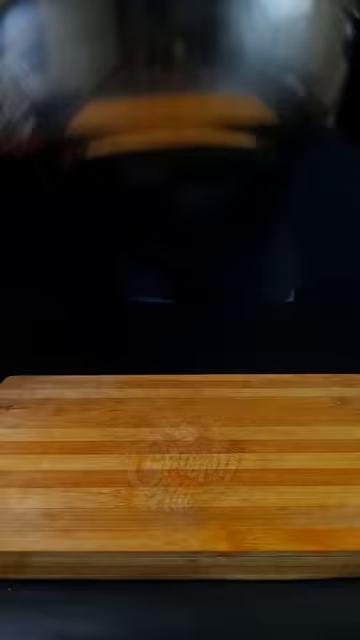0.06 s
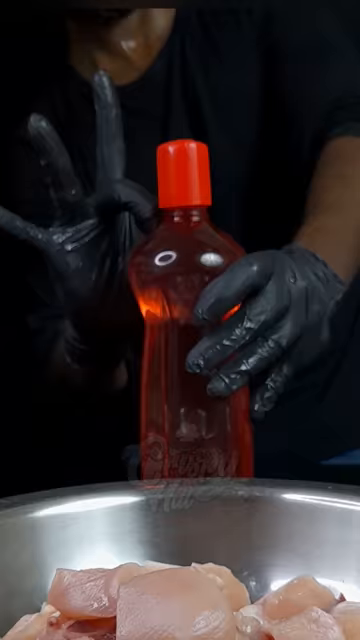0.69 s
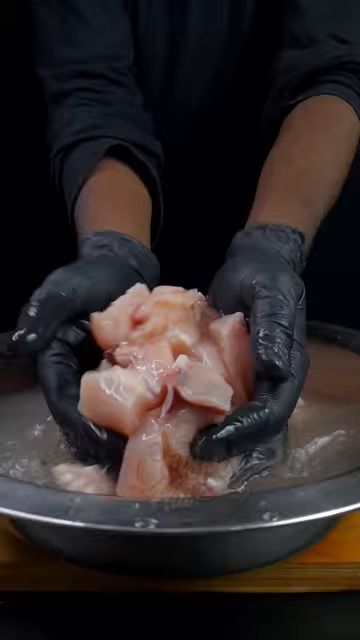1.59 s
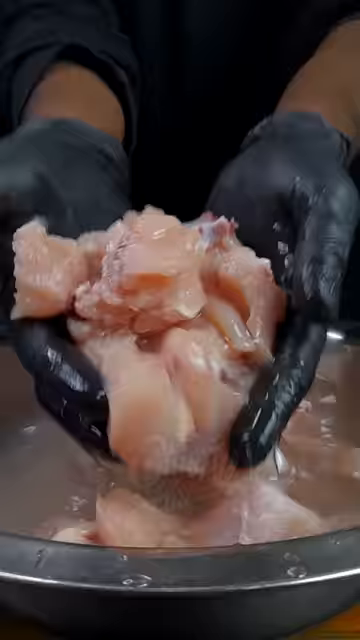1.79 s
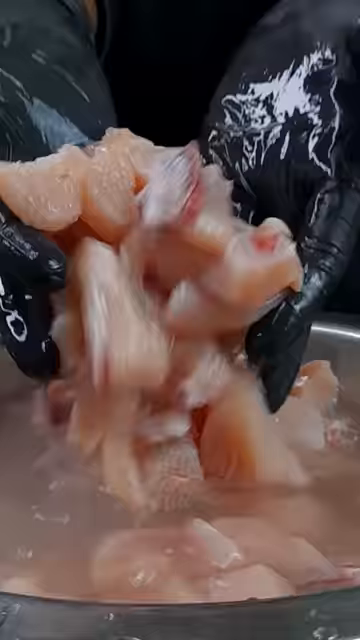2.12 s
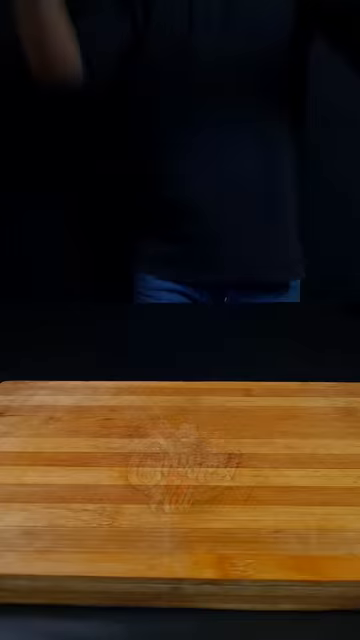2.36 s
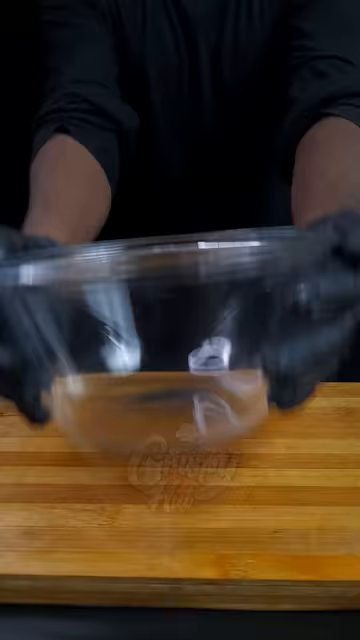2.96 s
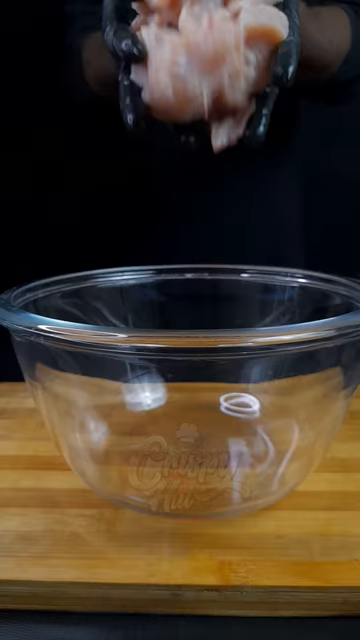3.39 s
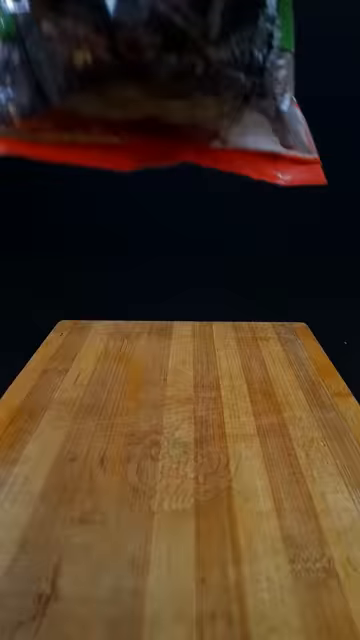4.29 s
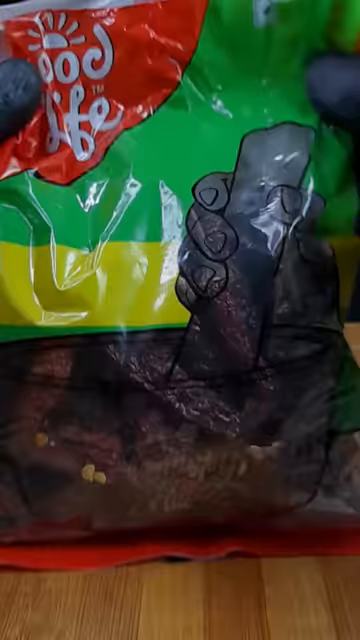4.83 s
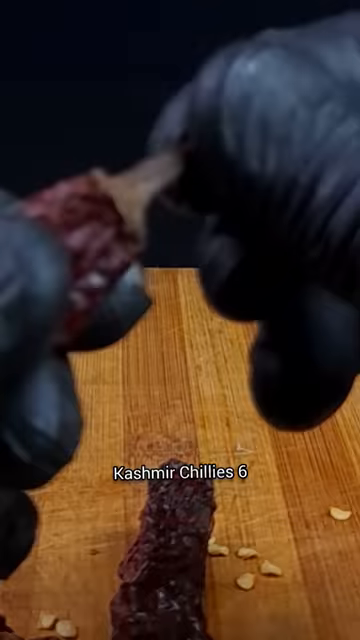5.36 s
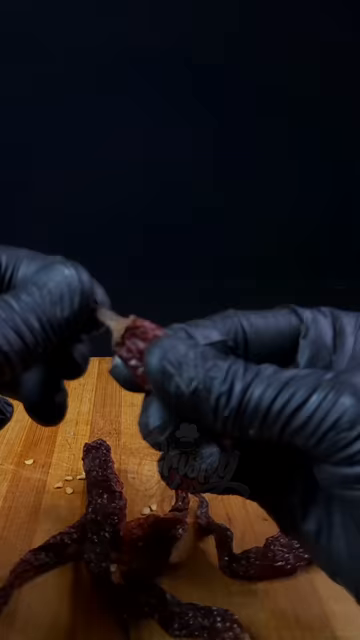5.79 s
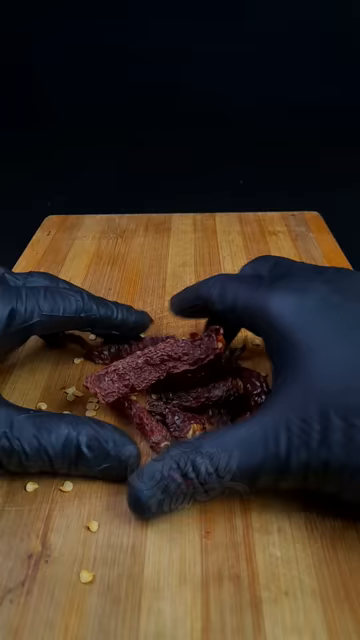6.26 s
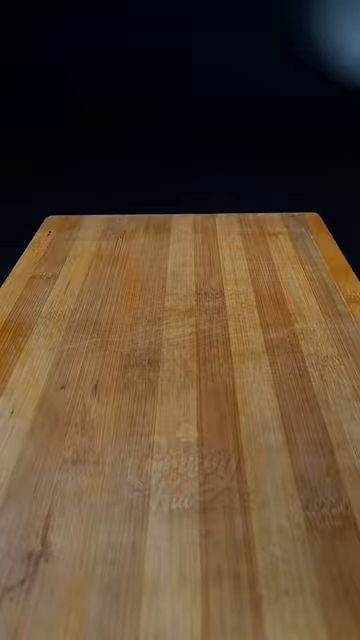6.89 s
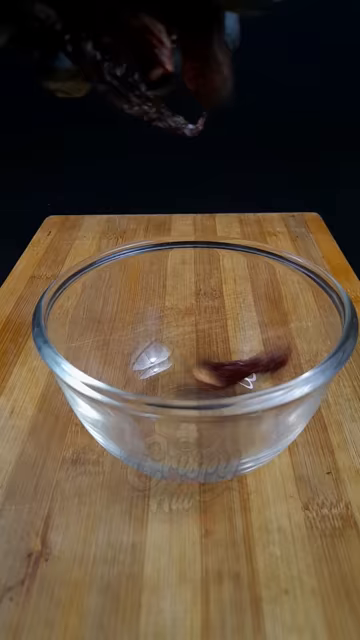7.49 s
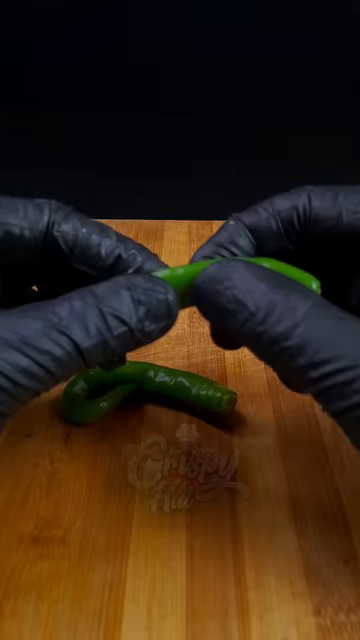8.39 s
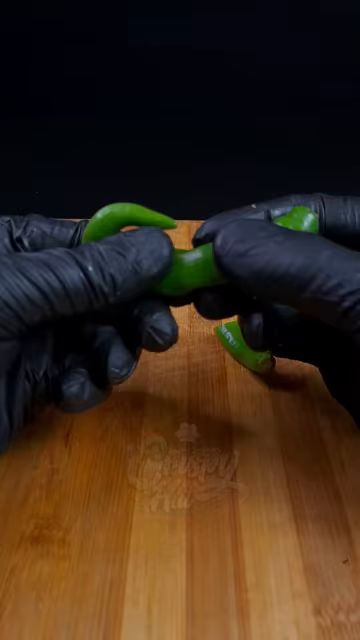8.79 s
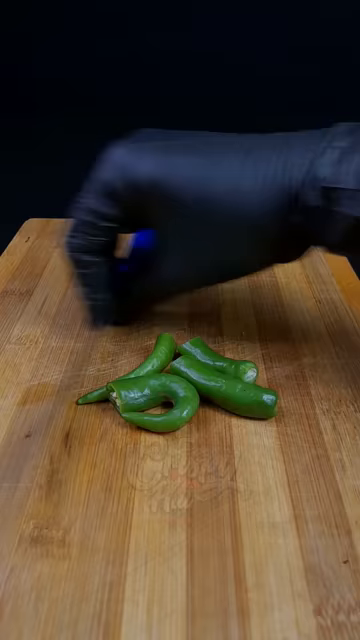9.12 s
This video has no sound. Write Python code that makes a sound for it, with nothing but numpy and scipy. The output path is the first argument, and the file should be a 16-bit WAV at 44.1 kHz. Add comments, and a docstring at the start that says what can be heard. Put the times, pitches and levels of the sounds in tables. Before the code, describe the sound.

Close up in a slightly echoing kitchen, raw chicken thuds into a steel bowl, is rinsed with sloshes and drips, then seasoned and turned with sticky squelches. A plastic packet drops on a wooden board, crinkles and tears. Sharp dry clicks come twice, followed by rustling. A glass bowl knocks down, dried chillies clack into it and water fizzes over them. Two taps, a slide and a crackle finish. Each sound cuts off abruptly.

```python
"""Kitchen, live room, close up, in quick cuts. Chicken lands in a steel bowl, is rinsed, seasoned and
turned; a packet drops on a wooden board and is torn open; a run of dry clicks sounds twice; dried
chillies are dropped into a glass bowl and soaked; two taps, a sliding stroke and a crackle follow.
Contacts are filtered noise bursts, friction is a swarm of clicks, water is rising bubble tones,
steel is decaying modes. Each cut chops sound and room tail."""
import sys
import numpy as np
from scipy import signal
from scipy.fft import rfft, irfft
from scipy.io import wavfile

SR = 44100
rng = np.random.default_rng(int(sys.argv[2]) if len(sys.argv) > 2 else 0)


def output_pcm(signal):
    """Save a mono or channel-first signal as 16-bit PCM at the path in sys.argv[1].

    Samples are clipped to [-1, 1] before scaling.
    """
    pcm = np.clip(np.atleast_2d(signal).T, -1, 1) * 32767
    wavfile.write(sys.argv[1], SR, np.round(pcm).astype(np.int16))


N = 428211

# shot ends: t/s
CUTS_S = [0.717, 1.075, 2.392, 2.96, 3.413, 3.993, 4.301, 5.031, 5.375, 6.912, 7.5, 8.055, 8.414, 8.806,
          9.57]
# tones (relative spectra) of hard contact, dry rubbing, tearing: f/Hz, level/dB
IMPACT_TONE = [(100, -26), (300, -3.5), (1300, -1), (4500, -10), (15500, -33.5)]
RUB_TONE = [(240, -61), (400, -20.5), (1150, -5), (1600, -1), (2710, -3.5), (4800, 2), (6500, -4),
            (8200, -11.5), (9950, -4.5), (15500, -13)]
RIP_TONE = [(88, -14), (150, -2), (766, 0.5), (1370, -2), (2500, 1), (5440, 0.5), (15500, -9)]


def amp(db):
    return 10 ** (np.asarray(db) / 20)


def rms_one(x):
    return x / np.sqrt(np.mean(x ** 2) + 1e-20)


def peak_one(x):
    return x / (np.abs(x).max() + 1e-20)


def seconds(count):
    return np.arange(count) / SR


def decay(t, t60_s):
    return np.exp(-np.log(1000) * t / max(t60_s, 1e-4))


def at_hz(points, hz):
    """Interpolate over log frequency."""
    known_hz, value = np.transpose(points)
    return np.interp(np.log(np.maximum(hz, 1)), np.log(known_hz), value)


def chopped(sound, count, fade_s=0.002):
    """Stop after count samples, without a click."""
    sound = sound[:max(count, 0)]
    return sound * np.minimum((count - np.arange(len(sound))) / (fade_s * SR), 1)


def placed(s, sound):
    """Put a sound on the time line, from s to the next cut."""
    out, at = np.zeros(N), int(np.clip(round(s * SR), 0, N - 1))
    shot_end = min([round(cut * SR) for cut in CUTS_S if cut > s] + [N])
    sound = chopped(sound, shot_end - at)
    out[at:at + len(sound)] = sound
    return out


def colour(x, tone, size=4096):
    """Minimum-phase filter; keeps the power of white noise."""
    cepstrum = irfft(np.log(amp(at_hz(tone, np.fft.rfftfreq(size, 1 / SR)))))
    cepstrum[1:size // 2] *= 2
    cepstrum[size // 2 + 1:] = 0
    response = irfft(np.exp(rfft(cepstrum)))
    return signal.fftconvolve(x, response / np.linalg.norm(response))


def tilted(tone, db_per_oct, corner_hz=500):
    """Same material, brighter or duller above the corner."""
    return [(hz, db + db_per_oct * np.log2(max(hz / corner_hz, 1))) for hz, db in tone]


def contact(tone, t60_s, click_db=-30, size=4096):
    """Click plus noise burst, sounding through a material; peak 1."""
    burst = rng.standard_normal(size) * decay(seconds(size), t60_s)
    burst[0] += amp(click_db) * np.linalg.norm(burst)
    return peak_one(colour(burst, tone))


def hits(rows, tone, t60_s, gain_db, click_db=-30):
    """One contact per row: t/s, level/dB."""
    return sum(placed(s, amp(db + gain_db) * contact(tone, t60_s, click_db)) for s, db in rows)


def effort(strokes, t, depth_db=30):
    """Envelope of an action: strokes swell, hold and fade, linear in dB."""
    power = 0
    for s, db, attack_s, hold_s, release_s in strokes:
        rising = np.maximum(1 - (t - s) / max(attack_s, 1e-4), 0)
        falling = np.maximum(t - s - attack_s - hold_s, 0) / max(release_s, 1e-4)
        power = power + (t >= s) * amp(db - depth_db * np.minimum(rising + falling, 10)) ** 2
    return np.sqrt(power)


def grains(strokes, tone, per_s, spread_db, hiss_db, gain_db, size=65536):
    """Tiny contacts of random size and band, over the hiss of finer ones."""
    heights = amp(spread_db * np.minimum(rng.exponential(1, size), 3)) * rng.choice([-1, 1], size)
    clicks = heights * (rng.random(size) < per_s / SR)
    edges_hz = [30, 500, 1200, 2600, 5000, 9000, 17000]
    band_of = rng.integers(0, len(edges_hz) - 1, size)
    ticks = 0
    for k, band_hz in enumerate(zip(edges_hz, edges_hz[1:])):
        bandpass = signal.butter(2, band_hz, "band", fs=SR, output="sos")
        ticks += signal.sosfilt(bandpass, rms_one(clicks * (band_of == k)) + 1e-18)
    texture = rms_one(ticks + amp(hiss_db) * rng.standard_normal(size))
    start_s = strokes[0][0]
    envelope = effort(strokes, start_s + seconds(size))
    return placed(start_s, amp(gain_db) * colour(texture * envelope, tone))


def bubble(hz, cycles, rise, size=8192):
    """A bubble swells, rings and rises in pitch as it nears the surface."""
    t, life_s = seconds(size), cycles / hz
    swell = 1 - np.exp(-t * hz / 2)
    glide = 1 + rise * np.minimum(t / life_s, 1)
    return np.sin(2 * np.pi * hz * np.cumsum(glide) / SR) * swell * decay(t, life_s)


def bubbles(strokes, low_hz, high_hz, gain_db, cycles, count):
    """Bubbles born at random while the water moves."""
    start_s = strokes[0][0]
    last_s, _, attack_s, hold_s, _ = strokes[-1]
    out = np.zeros(N)
    for when, pitch, softness in rng.random((count, 3)):
        born_s = start_s + when * (last_s + attack_s + hold_s - start_s)
        ring = bubble(low_hz * (high_hz / low_hz) ** pitch, cycles, rise=0.12)
        at = round(born_s * SR)
        out[at:at + len(ring)] += effort(strokes, born_s) * amp(gain_db - 10 * softness) * ring
    return out


def cloud(hz, octaves, within_s, cycles, count):
    """Bubbles of nearby pitch, trapped in quick succession; peak 1."""
    out = 0
    for k, (when, pitch, softness) in enumerate(rng.random((count, 3))):
        ring = bubble(hz * 2 ** (octaves * (pitch - 0.5)), cycles, rise=0.094)
        delay = round(within_s * SR * k * when / count)
        out += amp(-8 * softness) * np.pad(ring, (delay, 0))[:len(ring)]
    return peak_one(out)


def landings(size=16384):
    """Meat in steel, full bowl on wood, glass on wood: crack and knock, then the load settles."""
    # t/s, knock/dB, load/dB, settling/s, crack/dB
    impacts = [(0.4865, -10, -17, 0.06, 0), (3.146, -1, -21, 0.046, -13.5), (7.1395, -4.5, -18, 0.035, 1.5)]
    # body tones: f/Hz, level/dB
    meat = [(30, -19), (95, -1.5), (129, -7), (241, -1), (397, -8.5), (484, -6), (740, -8.5), (903, -8.5),
            (1560, -21.5), (2770, -18), (4130, -32.5), (4680, -25.5), (15500, -55.5)]
    full_bowl = [(30, -34.5), (60, -9), (170, -6.5), (273, -2), (407, -12.5), (484, -15), (637, -10),
                 (973, -17), (1300, -17), (1850, -17.5), (2390, -27), (3650, -34), (5580, -46),
                 (15500, -67.5)]
    glass_bowl = [(35, -40), (96, -10), (207, -7.5), (253, 2), (317, -12), (484, -4), (535, -19),
                  (591, -3.5), (973, -9), (1310, -3.5), (1600, -13.5), (3930, -23), (9890, -46),
                  (15500, -48)]
    out, t = np.zeros(N), seconds(size)
    for (s, knock_db, load_db, settle_s, crack_db), body in zip(impacts, (meat, full_bowl, glass_bowl)):
        knock = amp(knock_db) * contact(body, t60_s=0.012)
        settling = (1 - np.exp(-t / 0.0017)) * decay(np.maximum(t - settle_s, 0), t60_s=0.31)
        load = amp(load_db) * rms_one(colour(rng.standard_normal(size), body)[:size]) * settling
        crack = amp(crack_db) * contact(IMPACT_TONE, t60_s=0.0063)
        out += placed(s, knock) + placed(s, load) + placed(s, crack)
    return out


def thumps():
    """Parts of the load come down late, in soft blows."""
    # t/s, level/dB, centre f/Hz
    blows = [(0.495, -10, 800), (0.534, -10, 300), (3.168, -9, 200), (3.178, -4, 280), (7.174, -8.5, 290),
             (7.195, -19, 600), (7.204, -5, 810)]
    out = np.zeros(N)
    for s, db, hz in blows:
        hump = [(hz / 4, -26), (hz / 1.4, -4), (hz, 0), (hz * 1.4, -6), (hz * 3, -28), (hz * 30, -85)]
        out += hits([(s, db)], hump, t60_s=0.069, gain_db=-2)
    return out


def packet():
    """Stiff film lands, buckles in snaps and is torn open."""
    # strokes: t/s, level/dB, attack/s, hold/s, release/s
    land = [(4.545, -13, 0.006, 0.002, 0.12)]
    crumple = [(4.824, -14.5, 0.0049, 0.08, 0.064), (5.008, -14.5, 0.018, 0.013, 0.048)]
    tear = [(5.035, -29.5, 0.42, 0.02, 0.05), (5.275, -24.5, 0.0655, 0.0077, 0.017)]
    # f/Hz, level/dB
    land_tone = [(24, -35.5), (40, -2.5), (188, -1.5), (359, 2), (461, -8.5), (859, 7), (949, -4),
                 (1860, -1.5), (2010, -15), (4240, -5.5), (15500, -30)]
    film_tone = [(35, -45), (60, -12.5), (242, -2), (475, -7.5), (657, 3), (953, -5), (1170, -5),
                 (2840, -6.5), (3050, -9), (7200, -8), (8470, -22.5), (9970, -9), (15500, -25.5)]
    # t/s, level/dB
    buckles = [(4.555, 5.5), (4.574, -3.5), (4.691, -9), (4.829, -10.5), (4.8495, -2.5), (4.855, -4),
               (4.885, 0), (4.903, -2), (4.917, -7), (5.02, -6.5)]
    out = grains(land, land_tone, per_s=3000, spread_db=14.5, hiss_db=-8.5, gain_db=-8.5)
    out += grains(crumple, film_tone, per_s=1000, spread_db=-6, hiss_db=-7.5, gain_db=-8.5)
    out += grains(tear, RIP_TONE, per_s=3000, spread_db=5.5, hiss_db=-5, gain_db=-2)
    return out + hits(buckles, tilted(film_tone, -1.6), t60_s=0.025, gain_db=-5, click_db=-6.5)


def rinsing():
    """Hands stir meat in water: spray, sloshing, glugs of escaping air, splashes, plops, drops."""
    # strokes: t/s, level/dB, attack/s, hold/s, release/s
    stir = [(1.083, -51.5, 0.0035, 0.43, 0.29), (1.28, -48, 0.02, 0.024, 0.11), (2.02, -45, 0.28, 0.1, 0.1)]
    slosh = [(1.083, -48.5, 0.0037, 0.16, 0.25), (1.4, -47.5, 0.034, 0.034, 0.11)]
    # f/Hz, level/dB
    spray_tone = [(240, -13.5), (400, -18), (784, -12.5), (1300, -18.5), (2710, -11), (3110, -15.5),
                  (6090, -12.5), (8400, -25.5), (10400, -19), (15500, -30)]
    slosh_tone = [(30, -26), (100, -8.5), (204, 5), (278, -11), (450, -5), (780, -45)]
    # t/s, level/dB, f/Hz
    glugs = [(1.092, -30, 205), (1.138, -23, 209), (1.177, -25, 310), (1.206, -30, 241),
             (1.308, -25.5, 215), (1.459, -35, 192)]
    # t/s, level/dB, large bubbles f/Hz, small bubbles f/Hz
    splashes = [(1.172, -28.5, 592, 2520), (1.219, -31.5, 610, 2520), (1.3, -41.5, 540, 3400),
                (1.421, -32.5, 656, 2690), (1.459, -34.5, 710, 2230), (1.505, -41, 670, 2580)]
    # bubble pairs: t/s, level/dB, main f/Hz, second f/Hz, second re main/dB
    plops = [(1.803, -41, 944, 2020, -7), (1.857, -44.5, 2100, 1880, 5), (1.962, -31.5, 850, 2800, -11),
             (2.061, -48, 1750, 1070, 3), (2.118, -31, 965, 2000, 1), (2.216, -25, 1910, 950, -24),
             (2.293, -30, 984, 1240, -6), (2.328, -24, 3520, 2470, -10), (2.369, -29, 860, 2500, -17)]
    # gliding bubbles: t/s, level/dB, f/Hz, life/cycles, relative rise
    gurgle = [(2.143, -32, 640, 70, 0.69), (2.166, -39, 1650, 150, 1.3)]
    # drops on the meat: t/s, level/dB
    spatters = [(2.06, -38.5), (2.118, -31), (2.327, -31.5)]
    out = grains(stir, spray_tone, per_s=1500, spread_db=-0.5, hiss_db=-8, gain_db=-2.5)
    out += grains(slosh, slosh_tone, per_s=540, spread_db=3.5, hiss_db=-19, gain_db=3.5)
    out += bubbles(stir, low_hz=900, high_hz=7000, gain_db=17, cycles=21, count=70)
    out += sum(placed(s, amp(db) * bubble(hz, cycles=19.7, rise=0.2)) for s, db, hz in glugs)
    for s, db, large_hz, small_hz in splashes:
        large = cloud(large_hz, octaves=1.52, within_s=0.018, cycles=6.6, count=8)
        small = cloud(small_hz, octaves=0.21, within_s=0.025, cycles=45, count=6)
        out += placed(s, amp(db) * (large + amp(-2) * small))
    for s, db, main_hz, second_hz, second_db in plops:
        main = bubble(main_hz, cycles=27, rise=0.24)
        second = amp(second_db) * bubble(second_hz, cycles=28, rise=0.11)
        out += placed(s, amp(db) * (main + second))
    out += sum(placed(s, amp(db) * bubble(hz, cycles, rise)) for s, db, hz, cycles, rise in gurgle)
    out += hits([row[:2] for row in splashes], spray_tone, t60_s=0.05, gain_db=-0.5)
    return out + hits(spatters, tilted(spray_tone, -1), t60_s=0.11, gain_db=0.5)


def gushing():
    """One short gush ahead of the rinse."""
    # t/s, level/dB, attack/s, hold/s, release/s
    stroke = [(0.966, -23, 0.0026, 0.009, 0.19)]
    # f/Hz, level/dB
    tone = [(29, -65.5), (50, -24), (98, -0.5), (134, -18), (221, -2.5), (303, -14.5), (375, -5.5),
            (652, -20.5), (1190, -24), (1830, -15), (2620, -27.5), (3850, -14), (5260, -24.5),
            (15500, -22.5)]
    return grains(stroke, tone, per_s=6000, spread_db=0, hiss_db=-5, gain_db=0.5)


def seasoning():
    """Seasoning lands in one grainy burst."""
    # t/s, level/dB, attack/s, hold/s, release/s
    stroke = [(2.589, -24.5, 0.0055, 0.035, 0.15)]
    # f/Hz, level/dB
    tone = [(41, -52), (70, -16), (141, -11), (381, -4.5), (511, -3), (734, -10.5), (1260, -11),
            (1410, -5.5), (1550, -7), (4180, -11.5), (15500, -20)]
    return grains(stroke, tone, per_s=2700, spread_db=3, hiss_db=-7, gain_db=1)


def turning_meat():
    """Sticky pieces peel apart and slap back, wet skin rustles; a short, bright clink on the steel."""
    # strokes: t/s, level/dB, attack/s, hold/s, release/s
    peel = [(3.71, -34, 0.081, 0.12, 0.23)]
    squelch = [(4.16, -31.5, 0.044, 0.005, 0.25)]
    rustles = [(3.433, -58.5, 0.12, 0.23, 0.1), (4.005, -61.5, 0.013, 0.05, 0.25)]
    clink = [(3.847, -28, 0.0093, 0.002, 0.14)]
    # f/Hz, level/dB
    peel_tone = [(30, -21), (103, 5.5), (342, -7), (484, -26), (550, -9.5), (949, -21), (1680, -23),
                 (2770, -32), (3650, -23), (8520, -30), (14000, -27)]
    squelch_tone = [(24, -33), (40, -3), (143, -0.5), (280, -8), (330, -12.5), (949, -23), (1520, -11),
                    (2110, -11), (3840, -24), (15500, -30)]
    clink_tone = [(2400, -11), (3200, -12), (3600, 0), (4100, -15), (5200, -33)]
    # t/s, level/dB
    slaps = [(3.78, -14.5), (3.854, -33), (4.203, -7.5)]
    out = grains(peel, peel_tone, per_s=1700, spread_db=4.5, hiss_db=1, gain_db=0)
    out += grains(squelch, squelch_tone, per_s=730, spread_db=-8, hiss_db=-1, gain_db=-1.5)
    skin_tone = tilted(RUB_TONE, 6)
    for stroke in rustles:
        out += grains([stroke], skin_tone, per_s=3700, spread_db=4.5, hiss_db=-12.5, gain_db=-5.5)
    out += grains(clink, clink_tone, per_s=1700, spread_db=-12, hiss_db=1, gain_db=-5.5)
    return out + hits(slaps, tilted(IMPACT_TONE, 2), t60_s=0.0037, gain_db=-10)


def steel_bowl(size=32768):
    """Each touch rings the same modes; soft meat leaves the high ones weak."""
    # f/Hz, level/dB, t60/s
    modes = [(542, 4.5, 0.58), (1405, 3, 0.48), (2024, -5, 0.31), (2620, -4, 0.3), (3020, -9.5, 0.33),
             (3505, 1.5, 0.32), (4230, -3, 0.36)]
    # t/s, level/dB, pitch factor under load, tilt/(dB/oct)
    touches = [(2.595, -32, 0.97, 1.5), (3.78, -48, 1.1, -0.5), (3.857, -35.5, 1.01, -7.5)]
    out, t = np.zeros(N), seconds(size)
    for s, db, pitch, tilt in touches:
        ring = 0
        for hz, mode_db, t60_s in modes:
            gain = amp(mode_db + tilt * np.log2(hz / modes[0][0]))
            ring += gain * np.sin(2 * np.pi * hz * pitch * t) * decay(t, t60_s)
        out += placed(s, amp(db) * ring)
    return out


def dry_clicks():
    """The same run of dry, sharp clicks sounds twice; later a short crackle."""
    # t/s, level/dB
    runs = [(5.385, -10.5), (5.836, -11.5)]
    late_cracks = [(9.5787, -32.5), (9.6759, -14.5)]
    # one click, a quick cluster of four cracks, two late ticks: delay/s, level/dB, tilt/(dB/oct)
    pattern = [(0, -13.5, 0), (0.127, -17, 9), (0.138, -10, -5.5), (0.1428, 0.5, -2), (0.1512, -1.5, -3.5),
               (0.2803, -20.5, 2), (0.354, -28, 7)]
    # t/s, level/dB, attack/s, hold/s, release/s
    crackle = [(9.575, -48.5, 0.0037, 0.011, 0.37)]
    # f/Hz, level/dB
    click_tone = [(30, -41), (60, -11), (333, -30.5), (740, -22), (1600, -14.5), (3140, -28.5), (4030, -12),
                  (8310, -11), (15500, -5)]
    out = grains(crackle, RIP_TONE, per_s=250, spread_db=8, hiss_db=-7.5, gain_db=-2.5)
    for delay_s, crack_db, tilt in pattern:
        cracks = [(s + delay_s, db + crack_db) for s, db in runs]
        out += hits(cracks, tilted(click_tone, tilt), t60_s=0.013, gain_db=3, click_db=-3.5)
    return out + hits(late_cracks, click_tone, t60_s=0.022, gain_db=-0.5)


def dropping_pods(graze_lead_s=0.016, graze_db=-15):
    """Dry chillies graze the glass, clack against it and rustle over each other."""
    # t/s, level/dB, attack/s, hold/s, release/s
    tumble = [(7.53, -45.5, 0.017, 0.005, 0.38), (7.69, -46, 0.02, 0.01, 0.29),
              (7.815, -35, 0.019, 0.11, 0.065)]
    # t/s, level/dB, tilt/(dB/oct)
    drops = [(7.5554, -21.5, -1), (7.694, -23.5, -2), (7.812, -30, -1), (7.829, -20.5, 0.5), (7.84, -23, 0),
             (7.85, -21, -0.5), (7.922, -21, 0.5), (7.931, -19, -4.5)]
    # f/Hz, level/dB
    rustle_tone = [(76, -64), (130, -10), (206, 6.5), (517, -11), (961, -3), (1130, 6), (1820, -9.5),
                   (2720, -3.5), (3320, -6.5), (3980, 4), (8340, -8), (9980, -1.5), (15500, -9)]
    clack_tone = [(150, -14.5), (700, -10.5), (1150, -2), (1900, -16.5), (2700, 2.5), (3200, -7),
                  (3900, 5.5), (5000, -3), (6400, 3), (8200, -6.5), (9900, -0.5), (15500, -19)]
    out = grains(tumble, rustle_tone, per_s=990, spread_db=5, hiss_db=-6, gain_db=0)
    for s, db, tilt in drops:
        graze = (s - graze_lead_s, db + graze_db)
        out += hits([graze, (s, db)], tilted(clack_tone, tilt), t60_s=0.025, gain_db=3.5)
    return out


def taps():
    """Brief hard contacts on the board; the harder, the brighter."""
    # t/s, level/dB, tilt/(dB/oct)
    strikes = [(8.644, -11.5, 4.0), (8.9855, -13.5, 0.5)]
    # f/Hz, level/dB
    tone = [(40, -13), (250, -1.5), (400, -12), (880, 0.5), (1400, -7), (2100, -11), (3000, -18.5),
            (4100, -11.5), (6500, -18), (8500, -21.5), (15500, -36.5)]
    return sum(hits([(s, db)], tilted(tone, tilt), t60_s=0.004, gain_db=7.5, click_db=9)
               for s, db, tilt in strikes)


def sliding():
    """Friction of one stroke on the board."""
    # t/s, level/dB, attack/s, hold/s, release/s
    stroke = [(9.16, -25, 0.11, 0.13, 0.052)]
    # f/Hz, level/dB
    tone = [(80, -23.5), (188, 0.5), (300, -11), (654, 0), (1020, -5.5), (1310, 1.5), (1460, -4),
            (2930, -11), (4190, -8), (7730, -21.5), (15000, -20.5)]
    return grains(stroke, tone, per_s=4500, spread_db=4, hiss_db=2.5, gain_db=-3)


def pushing_pods():
    """Dry skins rub and now and then catch."""
    # t/s, level/dB, attack/s, hold/s, release/s
    pushes = [(6.316, -60, 0.00396, 0.05, 0.2), (6.3, -43, 0.092, 0.25, 0.27),
              (6.595, -40.5, 0.025, 0.031, 0.03)]
    # t/s, level/dB
    catches = [(6.613, -22), (6.6185, -24.5), (6.639, -41), (6.712, -27.5), (6.732, -24)]
    rub = grains(pushes, RUB_TONE, per_s=2400, spread_db=4, hiss_db=-4.5, gain_db=-2)
    return rub + hits(catches, tilted(RUB_TONE, -1.5), t60_s=0.042, gain_db=-3.5)


def soaking():
    """A thin stream fizzes on the pods and gulps down bubble clouds between them."""
    # t/s, level/dB, attack/s, hold/s, release/s
    pour = [(8.056, -51.5, 0.004, 0.367, 0.05), (8.17, -50.5, 0.08, 0.16, 0.064)]
    # f/Hz, level/dB
    spray_tone = [(180, -12), (300, -1), (461, -16.5), (663, -4.5), (1030, -8), (3570, -17), (4420, -11.5),
                  (6570, -14.5), (13800, -20), (15500, -35)]
    # t/s, level/dB, centre f/Hz
    gulps = [(8.066, -41.5, 770), (8.174, -43.5, 5030), (8.235, -40.5, 900), (8.267, -33.5, 4700),
             (8.305, -37, 5000), (8.319, -35, 1160), (8.348, -33, 6400)]
    spray = grains(pour, spray_tone, per_s=770, spread_db=6.5, hiss_db=-0.5, gain_db=-1)
    fizz = bubbles(pour, low_hz=3500, high_hz=7000, gain_db=13, cycles=32, count=30)
    gurgle = bubbles(pour, low_hz=600, high_hz=1900, gain_db=7, cycles=14, count=40)
    clouds = sum(placed(s, amp(db) * cloud(hz, octaves=1.02, within_s=0.014, cycles=18, count=10))
                 for s, db, hz in gulps)
    return spray + fizz + gurgle + clouds


def kitchen_response(t60_scale, size=32768):
    """Diffuse echo of unit energy; builds within milliseconds, loses treble first."""
    # f/Hz, t60/s
    bands = [(100, 0.76), (300, 0.58), (800, .48), (2000, 0.47), (5000, 0.39), (13000, .32)]
    t, hz = seconds(size), np.fft.rfftfreq(size, 1 / SR)
    noise, tail = rfft(rng.standard_normal(size)), 0
    centres_hz, t60s_s = np.transpose(bands)
    for t60_s, weights in zip(t60s_s, np.eye(len(bands))):
        band = irfft(noise * at_hz(list(zip(centres_hz, weights)), hz))
        tail += band * decay(t, t60_s * t60_scale)
    tail *= 1 - np.exp(-t / 0.0017)
    return tail / np.linalg.norm(tail)


def reverb(actions, t60_scale):
    """Room echo of (sound, send/dB) pairs, chopped at each cut."""
    response = kitchen_response(t60_scale)
    sent = sum(sound * amp(send_db) for sound, send_db in actions)
    edges = [0] + [min(round(s * SR), N) for s in CUTS_S] + [N]
    out = np.zeros(N)
    for start, end in zip(edges, edges[1:]):
        out[start:end] = chopped(signal.fftconvolve(sent[start:end], response), end - start)
    return out


def noise_floor(rms_db=-64):
    """Steady, faint, mostly low noise."""
    # f/Hz, level/dB
    tone = [(30, -17.5), (140, -6), (205, 1), (530, -17), (2000, -31), (5600, -34), (6700, -31),
            (8000, -43), (10200, -31.5), (15500, -41)]
    return amp(rms_db) * rms_one(colour(rng.standard_normal(N), tone)[:N])


def scene():
    """Mono mix; work on the board dies away sooner than work in the bowls."""
    gush, season, slide = gushing(), seasoning(), sliding()
    # sound, reverb send/dB
    at_bowls = [(landings() + thumps(), -2.5), (gush, -6), (rinsing(), -6), (season, -5.5),
                (turning_meat(), -10.5), (dropping_pods(), -5.5), (soaking(), -10)]
    on_board = [(packet(), -10.5), (dry_clicks(), -9), (pushing_pods(), -9.5), (taps(), -7), (slide, -1)]
    direct = sum(sound for sound, _ in at_bowls + on_board) + steel_bowl()
    room = reverb(at_bowls, t60_scale=1) + reverb(on_board, t60_scale=0.74)
    return (direct + room + noise_floor())[None]


def record(dry):
    """Soft clip, then low-pass."""
    cutoff_hz = 16000
    return signal.sosfilt(signal.ellip(10, 0.2, 70, cutoff_hz, fs=SR, output="sos"), np.tanh(dry))


dry = scene()
out = record(dry)
output_pcm(out)
```